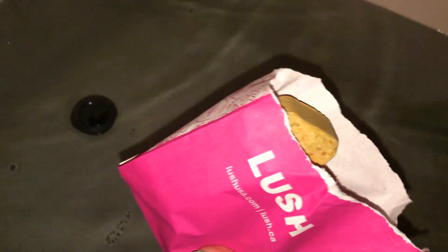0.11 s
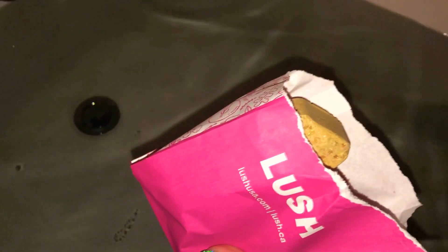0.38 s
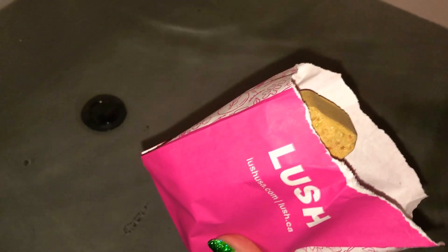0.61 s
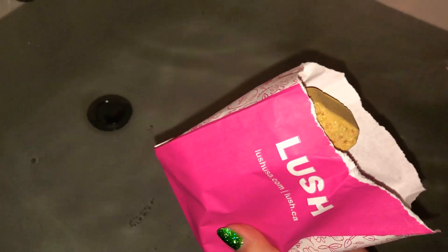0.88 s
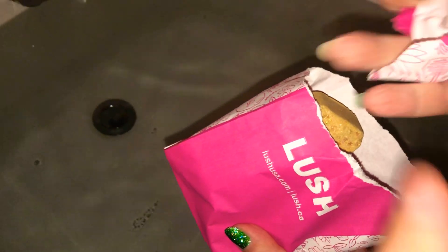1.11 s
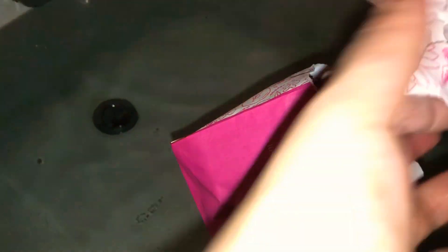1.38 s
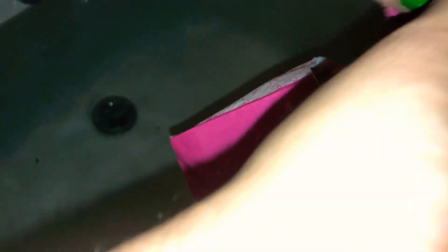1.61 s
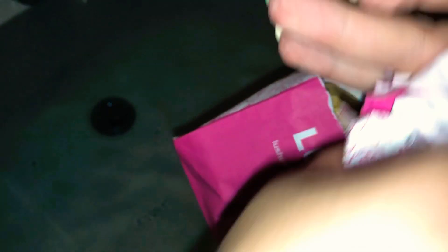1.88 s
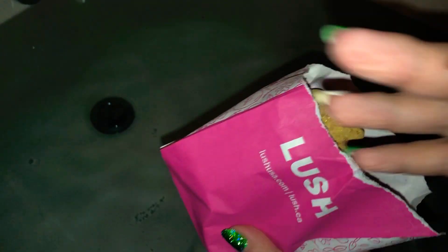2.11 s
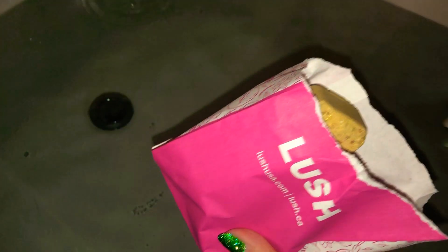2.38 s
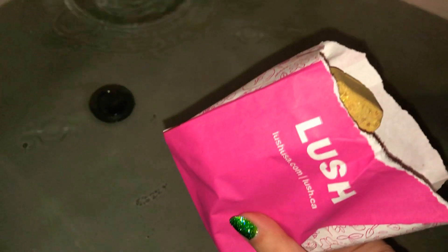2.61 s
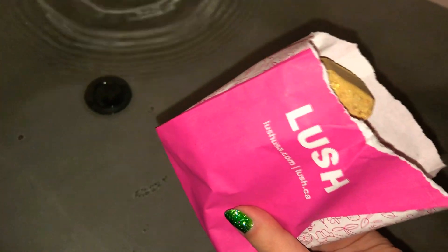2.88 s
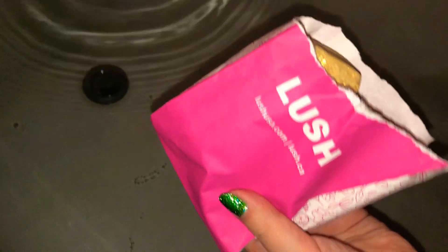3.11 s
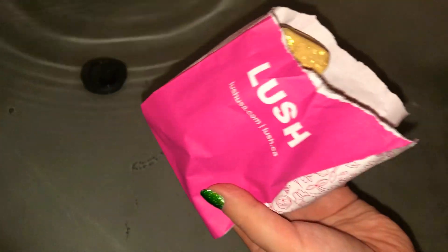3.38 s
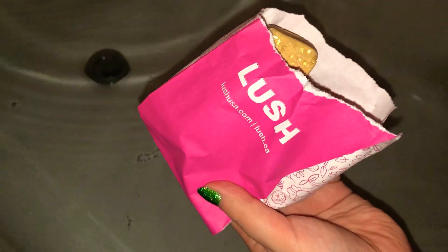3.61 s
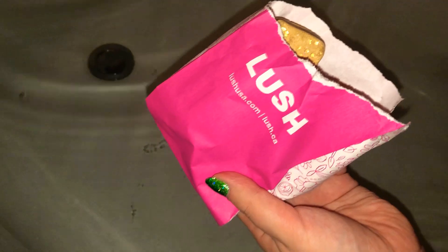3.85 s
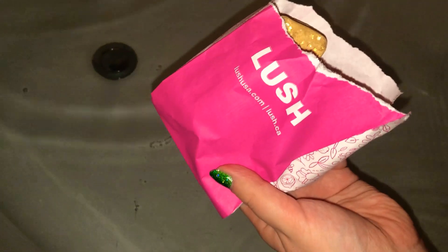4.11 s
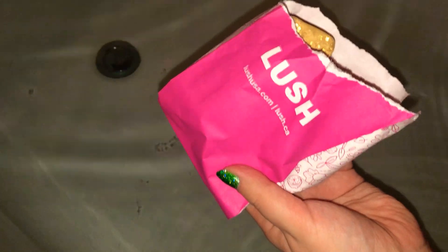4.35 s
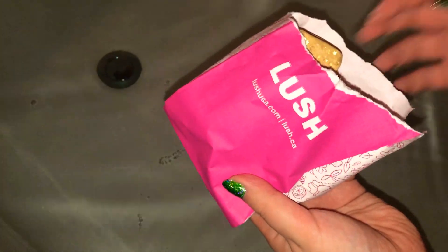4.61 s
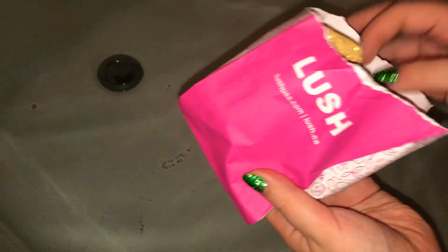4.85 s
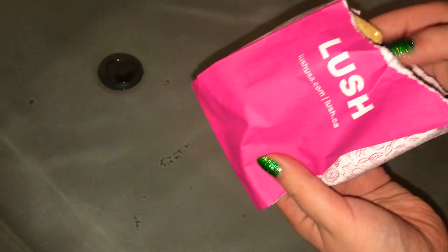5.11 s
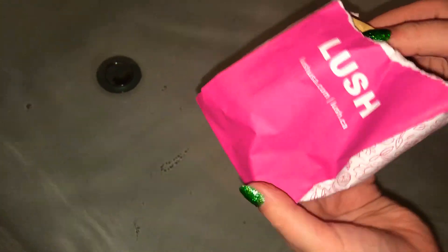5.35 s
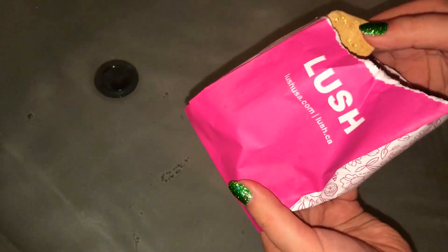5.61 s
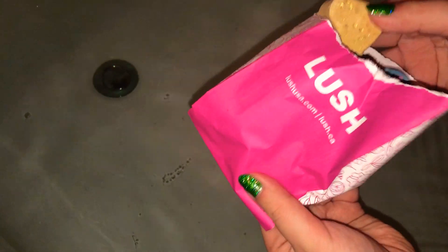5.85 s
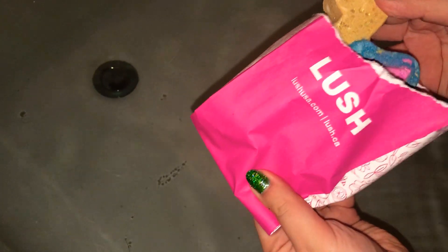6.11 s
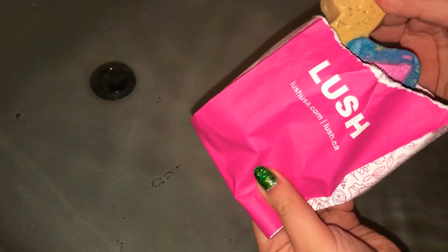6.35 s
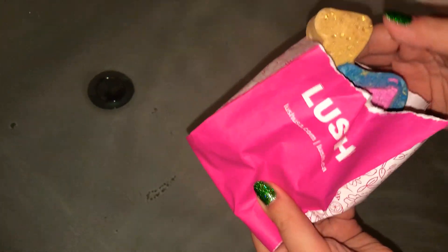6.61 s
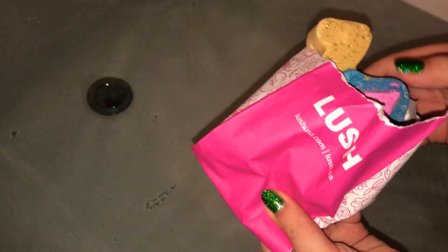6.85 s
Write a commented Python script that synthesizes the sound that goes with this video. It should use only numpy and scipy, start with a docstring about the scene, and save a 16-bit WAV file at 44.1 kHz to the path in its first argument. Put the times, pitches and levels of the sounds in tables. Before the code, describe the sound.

A stiff paper bag crumples with dense, sharp crackles, quiets to near stillness, then crackles again as something is drawn out, in a small hard room.

```python
"""A stiff paper bag is crumpled, held nearly still, then rubbed and bent as something is drawn out of it.
Creases snap as filtered blows: the bending wave brings treble first and bass later, then rattles in noisy
echoes. Rustle and ticks are random slips that follow the effort of the hands; popping walls and the air ringing
inside the bag are short sagging tones. The air in the bag rings, a small hard room answers with shaped noise,
and a low hush lies underneath."""
import sys
import numpy as np
from scipy import signal
from scipy.fft import rfft, irfft, next_fast_len
from scipy.io import wavfile
from scipy.ndimage import uniform_filter1d

SR = 44100
rng = np.random.default_rng(int(sys.argv[2]) if len(sys.argv) > 2 else 0)


def level_to_linear(level):
    """Convert decibel levels to linear amplitude factors, elementwise."""
    exponent = np.asarray(level, float) / 20
    return 10 ** exponent


def unload_audio(sound):
    """Save the sound as a 16-bit wav file, at the path given as the first command line argument."""
    columns = np.transpose(np.atleast_2d(sound))
    # keep every value between -1 and 1, then stretch to whole-number steps
    steps = np.round(np.clip(columns, -1, 1) * 32767)
    wavfile.write(sys.argv[1], SR, steps.astype(np.int16))


N = 307729  # length in samples


def read(points, hz):
    """Joins the points of a spectrum by straight lines on a log frequency axis."""
    point_hz, value = np.transpose(points)
    return np.interp(np.log(hz + 1), np.log(point_hz + 1), value)


def evened(x):
    """Scales to rms 1."""
    return x / np.sqrt(np.mean(x ** 2) + 1e-20)


def add(mix, start_s, sound):
    """Mixes a sound in from start_s."""
    part = mix[max(round(start_s * SR), 0):][:len(sound)]
    part += sound[:len(part)]


def bell(hz, centre_hz, octaves):
    """A bump of height 1 around one pitch, even on a log frequency axis."""
    return np.exp(-(np.log2((hz + 1) / centre_hz) / octaves) ** 2)


def shelves(hz, body_db, edge_db, body_hz=1200, edge_hz=7000):
    """Large folds add body below body_hz, tight folds add edge above edge_hz."""
    body = body_db / (1 + (hz / body_hz) ** 3)
    edge = edge_db / (1 + (edge_hz / (hz + 1)) ** 4)
    return body + edge


def bending(hz, lag_s):
    """Bending waves run at a speed that grows as the root of frequency; lag_s is the delay at 1 kHz."""
    return np.exp(-4j * np.pi * lag_s * np.sqrt(1000 * hz))


def causal(gain_db):
    """Gives a colour the phase of a filter that rings only after the blow (minimum phase)."""
    cepstrum = irfft(gain_db * np.log(10) / 20)
    cepstrum[len(gain_db):] = 0
    cepstrum[1:len(gain_db) - 1] *= 2
    return np.exp(rfft(cepstrum))


# colour of the hush: pitch_hz [Hz], level_db [relative dB per Hz]
AIR_COLOUR = [(15, -35.5), (25, -7), (105, 5), (180, -5), (249, 1.5), (326, -19.5), (480, -4.5),
              (1190, -35), (3520, -22.5), (16000, -33.5)]


def air():
    """The low steady hush of the room: coloured noise at an rms of -70 dB."""
    hz = np.fft.rfftfreq(N, 1 / SR)
    spectrum = rfft(rng.standard_normal(N)) * level_to_linear(read(AIR_COLOUR, hz))
    return level_to_linear(-70) * evened(irfft(spectrum, N))


# how long the room rings: pitch_hz [Hz], t60_s [s to die by 60 dB]
ROOM_DECAY = [(300, 0.13), (1300, 0.17), (3500, 0.17), (9000, 0.16), (16000, 0.12)]


def room(x):
    """Dense reflections off hard walls, each band dying at its own speed."""
    since = np.arange(SR // 2) / SR
    build_up = np.clip(since / 0.013, 0, 1)
    reflections = rng.standard_normal(SR // 2) * build_up
    hz, t, bands = signal.stft(reflections, SR, nperseg=128)
    decay_db = -60 * t / read(ROOM_DECAY, hz)[:, None]
    tail = signal.istft(bands * level_to_linear(decay_db), SR, nperseg=128)[1]
    return signal.fftconvolve(x, tail / np.linalg.norm(tail))[:N]


# the air inside the bag: pitch_hz [Hz], width_hz [Hz], level_db [dB]
BAG_AIR = (790, 68, -16.5)


def hollow(x):
    """The air in the bag rings briefly, as one resonance, at whatever the walls do."""
    pitch_hz, width_hz, level_db = BAG_AIR
    return level_to_linear(level_db) * signal.lfilter(*signal.iirpeak(pitch_hz, pitch_hz / width_hz, SR), x)


def pop(peak_db, pitch_hz):
    """A short pop: a few cycles around pitch_hz that sag in pitch."""
    cycles = np.arange(0, 12, pitch_hz / SR)
    tone = np.sin(2 * np.pi * (1.035 * cycles - 0.0066 * cycles ** 2))
    shape = cycles * np.exp(-cycles * 0.86) * tone
    return level_to_linear(peak_db) * shape / abs(shape).max()


# walls of the bag popping in and out, and the air inside ringing out near 800 Hz: start_s [s], peak_db [dB],
# pitch_hz [Hz]
BAG_POPS = [(0.84, -52.5, 112), (.943, -40, 387), (.944, -34.5, 790), (1.005, -37, 800),
            (1.045, -45.5, 283), (1.171, -35.5, 806), (2.949, -43, 770), (3.152, -53.5, 108),
            (3.318, -48, 730), (3.445, -53, 312), (4.019, -48.5, 920), (4.796, -56.5, 119),
            (4.865, -49.5, 735), (5.59, -40, 455), (5.592, -36, 890), (5.595, -54, 156), (6.09, -49, 278),
            (6.099, -42.5, 117), (6.127, -33, 282), (6.529, -53, 89.5), (6.687, -31.5, 1150),
            (6.815, -36, 950)]


def pops(paper):
    """Walls of the bag pop in and out as their panels flip, and the air inside rings out near 800 Hz; each
    starts 2 ms ahead of its time."""
    for start_s, peak_db, pitch_hz in BAG_POPS:
        add(paper, start_s - .002, pop(peak_db, pitch_hz))


# fingers sliding over the paper: full_s [s of full effort], effort_db [dB],
# rise_s [s to rise 20 dB; sign ignored, kept within 1 to 100 ms], hold_s [s], panel_hz [Hz, panel under the fingers]
FINGER_STROKES = [(1.94, -41.5, 0.1, 0.03, 3400), (2.46, -46, 0.1, 0.018, 5500),
                  (3.502, -49, 0, 0.14, 1010), (3.864, -56.5, -1.4, 0.02, 4100),
                  (5.571, -40.5, 0.1, 0.011, 5930), (6.456, -40, 0.1, 0.087, 2100),
                  (6.526, -40.5, -3.6, 0.015, 7650)]
# the sheet gives way at once and crackles while it settles:
# full_s [s of full effort], effort_db [dB], hold_s [s], panel_hz [Hz, panel that gives]
SHEET_JOLTS = [(0.43, -42, 0.118, 2600), (0.7, -40, 0.061, 3700), (0.865, -50.5, 0.013, 3500),
               (1.054, -42, 0.033, 7540), (1.11, -39.5, 0.046, 2200), (1.165, -47, 0.11, 3400),
               (2.057, -34.5, 0.089, 6160), (2.691, -46.5, 0.34, 3700), (2.96, -50.5, 0.04, 780),
               (3.045, -49, .008, 2600), (3.303, -60.5, 0.017, 720), (3.216, -51, 0.081, 6800),
               (4.014, -63.5, 0.02, 890), (4.228, -50, 0.011, 1400), (4.38, -64.5, 0.025, 3900),
               (4.531, -65.5, 0.027, 3700), (4.905, -53.5, 0.051, 2140), (4.934, -44.5, 0.23, 760),
               (5.28, -59, 0.03, 1500), (5.316, -45, 0.025, 7550), (5.395, -42.5, 0.037, 870),
               (5.507, -43, 0.064, 5960), (5.83, -42.5, 0.4, 2720), (6.302, -51, 0.007, 6000),
               (6.33, -53, 0.031, 4300), (6.669, -52, 0.012, 2400), (6.686, -41.5, 0.0079, 2300),
               (6.742, -46.5, 0.14, 940)]


def gestures(t):
    """Strokes and jolts rise, sag while held and let go: yields the power and panel pitch of each."""
    jolt_rise_s = .002  # to rise 20 dB
    sag_db_per_s, release_db_per_s = 35.5, 267
    jolts = [(s, db, jolt_rise_s, hold_s, hz) for s, db, hold_s, hz in SHEET_JOLTS]
    for full_s, effort_db, rise_s, hold_s, panel_hz in FINGER_STROKES + jolts:
        since = t - full_s
        held = np.clip(since, 0, abs(hold_s))
        rise_db = 20 * np.minimum(since, 0) / np.clip(abs(rise_s), .001, .1)
        release_db = release_db_per_s * np.maximum(since - held, 0)
        yield level_to_linear(2 * (effort_db + rise_db - sag_db_per_s * held - release_db)), panel_hz


# the uneven kneading of the bag, swelling and sinking, nearly still around 4 s: time_s [s], effort_db [dB]
KNEADING = [(0.0, -62.5), (0.3, -39), (0.42, -41), (0.69, -47), (0.89, -44), (1.1, -42.5), (1.33, -35),
            (1.36, -43), (1.47, -45), (1.55, -44), (1.68, -38), (1.89, -46), (2.03, -48.5), (2.18, -42.5),
            (2.33, -30), (2.4, -49.5), (2.65, -56.5), (2.95, -53), (3.11, -42), (3.2, -55), (3.46, -57),
            (3.75, -64), (3.8, -65), (4.1, -73), (4.21, -77.5), (4.48, -75), (4.63, -74), (4.73, -78),
            (5.26, -67.5), (5.65, -48.5), (5.79, -56), (6.17, -42), (6.29, -58), (6.62, -60), (6.98, -53)]


def effort(t):
    """Effort of the hands in dB: kneading plus strokes and jolts; powers add."""
    kneading = level_to_linear(2 * np.interp(t, *np.transpose(KNEADING)))
    return 10 * np.log10(kneading + sum(power for power, panel_hz in gestures(t)))


def ticks(effort_db):
    """Small stray creases, each kind with its own pitch, a cycle or two long, following the effort."""
    out, t = np.zeros(N), np.arange(400) / SR
    for hz in np.geomspace(2000, 12000, 12):
        struck = rng.random(N) < 22 / SR  # about 22 a second of each kind
        size = level_to_linear(3.5 * np.minimum(rng.exponential(1, N), 4)) * struck
        tick = np.sin(2 * np.pi * hz * t) * hz * t * np.exp(-hz * t / 0.45)
        out += signal.oaconvolve(size, tick)[:N]
    return out * level_to_linear(effort_db + 14)


def patchy(shape, bands, frames):
    """Random unevenness over pitch and time, smoothed over so many bands and frames."""
    across = uniform_filter1d(rng.standard_normal(shape), bands, 0)
    return evened(uniform_filter1d(across, frames, 1))


# fine rustle: pitch_hz [Hz], level_db [relative dB per Hz]
RUSTLE_COLOUR = [(35, -31), (100, 3.5), (260, 12.5), (700, 9.5), (1200, 9), (3700, 6.5), (8000, 8),
                 (15000, 4.5)]
# colour of the rustle over time: time_s [s], body_db [dB, at middling effort], edge_db [dB]
RUSTLE_TONE = [(0, -8.5, -11.5), (0.45, -2.5, -15.5), (0.9, -5, -5.5), (1.27, -10, -16.5),
               (1.9, -8.5, -10.5), (2.1, -5.5, -10.5), (2.35, -12, -23.5), (2.5, -16, -13),
               (2.75, -19.5, -18), (2.95, -8, -11), (3.1, -15.5, -6), (3.35, -0.5, -7), (3.6, -18, -10),
               (4.1, -5.5, -16.5), (4.601, -13.5, -6), (4.87, 2, -10), (5.0, 1, -9.5), (5.35, -7.5, -6),
               (5.6, 1, -6), (5.8, 2, -6.5), (6.1, 4, -7.5), (6.3, -1, -8.5), (6.55, 1.5, -7),
               (6.98, -1, -11)]


def rustle(effort_db):
    """Thousands of tiny slips and buckles, coming in clumps, coloured by how the hands bend the sheet."""
    slips_per_s, slip_spread_db, clump_db = 6000, 2.6, 2.0
    middling_db, body_slope = -50, -0.5  # the body swells less than the rest as effort grows (dB per dB)
    panel_db, panel_octaves = 4.5, 0.21  # how strongly and widely the handled panel colours its rustle
    broad_db = 7  # broad panels below 1 kHz ring this much more

    clumps = evened(uniform_filter1d(rng.standard_normal(N), 500))
    size = level_to_linear(slip_spread_db * np.minimum(rng.exponential(1, N), 6) + clump_db * clumps)
    slips = size * rng.choice([-1, 1], N) * (rng.random(N) < slips_per_s / SR)
    hz, t, bands = signal.stft(evened(slips), SR, nperseg=512, noverlap=384)
    hz = hz[:, None]

    time_s, body_db, edge_db = np.transpose(RUSTLE_TONE)
    frame_effort_db = effort(t)
    body_db = np.interp(t, time_s, body_db) + body_slope * (frame_effort_db - middling_db)
    edge_db = np.interp(t, time_s, edge_db)
    panels = 0
    for power, panel_hz in gestures(t):
        height_db = panel_db + broad_db * (panel_hz < 1000)
        panels = panels + power * height_db * bell(hz, panel_hz, panel_octaves)
    # each panel counts by its share of the whole effort
    bend_db = shelves(hz, body_db, edge_db) + panels / level_to_linear(2 * frame_effort_db)

    patches_db = 1.7 * patchy(bands.shape, 10, 8)
    rings_db = 3 * patchy(bands.shape, 3, 30) / (1 + hz / 3000)  # narrow and lasting
    colour_db = read(RUSTLE_COLOUR, hz) + bend_db + patches_db + rings_db
    bands = bands * level_to_linear(colour_db) * bending(hz, 0.00123)
    sound = signal.istft(bands, SR, nperseg=512, noverlap=384)[1][:N]
    return sound * level_to_linear(effort_db)


# colour of one snap: pitch_hz [Hz], level_db [relative dB]
SNAP_COLOUR = [(150, -19), (600, -6.5), (1200, 2), (7000, 1), (16000, -8.5)]


def snap(peak_db, peak_hz, body_db, edge_db, rattle_db, chance):
    """A sudden buckle, then its echoes from folds and edges; more rattle also spreads the wave more."""
    t, hz = np.arange(len(chance)) / SR, np.fft.rfftfreq(len(chance), 1 / SR)
    bump_db = 7 * bell(hz, peak_hz, 0.28)
    colour = causal(read(SNAP_COLOUR, hz) + bump_db + shelves(hz, body_db, edge_db))
    colour = colour * bending(hz, 0.00589 * level_to_linear(rattle_db))
    buckle = irfft(colour)
    top = abs(signal.hilbert(buckle)).max()
    # a slow and a very fast decay, each given by its s to fall 20 dB
    fading = level_to_linear(-20 * t / 0.011) + 0.36 * level_to_linear(-20 * t / 0.00019)
    echoes = chance * abs(chance) * fading * np.clip(t / 0.00015, 0, 1)
    rattle = level_to_linear(rattle_db) * top * irfft(rfft(echoes) * colour) / np.linalg.norm(buckle)
    return level_to_linear(peak_db) * (buckle + rattle) / top  # peak_db is that of the buckle alone


# a fold that creaks: start_s [s], slips [count], gap_s [s between slips], peak_db [dB], pitch_hz [Hz]
FOLD_CREAK = (1.8755, 5, 0.0102, -27, 9500)


def creak(paper):
    """A fold creaks in a short, slightly uneven run of thin ticks, each a small snap."""
    start_s, slips, gap_s, peak_db, pitch_hz = FOLD_CREAK
    for k, chance in enumerate(rng.standard_normal((slips, 4096))):
        tick = snap(peak_db, pitch_hz, -20, 22, -30, chance)
        add(paper, start_s + gap_s * (k + 0.08 * chance[0]), tick)


# creases that snap: start_s [s], peak_db [dB], peak_hz [Hz, pitch brought out],
# body_db [dB, below 1.2 kHz], edge_db [dB, above 7 kHz]
CREASES = [(0.2456, -23.5, 6600, 1.5, 9), (0.436, -18.5, 4780, 7.5, 2), (0.448, -16, 2910, -21, -52),
           (0.477, -25.5, 1320, -13, -34), (0.502, -19, 4560, -3, -2), (0.545, -12, 10200, -12, -5.5),
           (0.7029, -10, 3540, -50, -70), (0.7068, -19.5, 3820, -9, -12.5), (0.7693, -12.5, 2340, 3, -1.5),
           (0.8, -12.5, 6970, -53, -4), (0.858, -27.5, 2670, -22.5, -24.5), (0.944, -19.5, 8000, 11, 4.5),
           (1.0011, -14, 2030, 0, 3), (1.0433, -6, 7470, -23, -4.5), (1.1111, -18.5, 6200, 11, 11.5),
           (1.1708, -16, 8500, -10, -4), (1.228, -21.5, 4910, -21, -10.5), (1.28, -21.5, 5680, 12, 7),
           (1.345, -23.5, 7000, -1, 15), (1.4012, -23, 6800, 3.5, 3.5), (1.4072, -21.5, 6870, -11, 5),
           (1.4512, -11, 5400, -1, -4.5), (1.4955, -28.5, 2860, -15, -2.5), (1.62, -25, 3770, -17, -3),
           (1.669, -20.5, 3520, -1.5, -9), (2.0435, -27, 1820, -16, -22), (2.1165, -7, 4570, -53, -11),
           (2.1307, -15, 3950, -18, -7.5), (2.1463, -24.5, 4330, -3, -11), (2.1799, -13, 3120, -5.5, -9.5),
           (2.2431, -11.5, 3890, -25, -7), (2.255, -20.5, 4200, -5.5, 29), (2.441, -24, 2620, -19, -15),
           (2.4768, -24, 8800, -42, -3), (2.5906, -37.5, 2930, -7, -13), (2.6076, -37, 3230, -23, -24),
           (2.671, -32.5, 6400, -14, -8), (2.7024, -30.5, 3570, -11, -19), (2.752, -37.5, 2700, -13, -12),
           (2.913, -35, 1870, 9, -20), (2.9938, -27.5, 5700, -14, 1), (3.1669, -33, 4400, -22, -10),
           (3.2193, -10.5, 7420, -41, 2), (3.276, -34, 6980, -14, 16), (3.2982, -27, 7350, 28, 24),
           (3.305, -22.5, 9600, -23, 2), (3.3922, -33.5, 7240, -8, 16), (3.482, -27, 3800, -34, 1),
           (3.6625, -33, 4700, -10, -15), (3.8096, -45, 4860, -7, 9), (3.845, -48, 4660, -12, -3),
           (3.8648, -35.5, 5150, -5, -5), (3.9625, -41, 3730, 4, -3.5), (4.231, -43, 1440, -8, -24),
           (4.571, -42.5, 4280, -33.5, 1), (4.784, -49.5, 3615, -12.5, 5.5), (4.802, -48, 5600, -23, 8),
           (5.2925, -33.5, 9560, 0, -3), (5.3042, -29, 11100, -25, 0), (5.34, -28.5, 8800, -17, 0),
           (5.5092, -27.5, 4460, 15, -14), (5.5555, -19.5, 6050, -4, -12), (5.575, -25, 2350, 0, -13),
           (5.593, -21.5, 2960, 16, -21), (5.7367, -27, 6200, 5, -9), (5.757, -34.5, 1970, -3.5, -21),
           (5.8169, -26, 1086, 13.5, 2.5), (5.8303, -12, 7900, -23, -8), (5.8476, -20.5, 1095, 6, 6),
           (5.891, -23, 9690, 5, -4), (5.8965, -15.5, 10200, -13, 7), (5.9125, -16.5, 1970, 5.5, -6),
           (5.946, -22, 5600, -18, -8), (5.9725, -29, 5120, -14.5, 23), (5.992, -4, 4770, 13, 7),
           (6.091, -24.5, 1900, 20, -34), (6.1292, -27, 4430, -1, -1), (6.1765, -21, 4010, -27, 8),
           (6.2412, -26.5, 4060, 11, 4), (6.2576, -33, 1880, 13, -18), (6.3182, -21, 1880, 2, -12),
           (6.345, -28, 8950, -25, -5), (6.411, -32, 2940, -16, 5), (6.4379, -30, 1280, 9, -15),
           (6.451, -32.5, 2200, -6, -23), (6.6716, -35.5, 2400, 21, -9), (6.6926, -14, 5880, 6.5, -18),
           (6.7497, -3, 8700, 2.5, -2.5), (6.853, -24.5, 8400, 8, 14), (6.9322, -34.5, 1300, 23, -26),
           (6.961, -34, 6300, -14, 12)]


def creases(paper):
    """Creases of the bag snap one by one; softer snaps rattle more, tight high folds rattle less."""
    rattle_at_0_db, rattle_slope = -19, -0.131  # dB for a snap peaking at 0 dB, dB per dB of peak
    tight_db = -2.5  # per octave above 4 kHz
    for start_s, peak_db, peak_hz, body_db, edge_db in CREASES:
        rattle_db = rattle_at_0_db + rattle_slope * peak_db + tight_db * np.log2(peak_hz / 4000)
        chance = rng.standard_normal(4096)
        add(paper, start_s - .0003, snap(peak_db, peak_hz, body_db, edge_db, rattle_db, chance))


def scene():
    """Paper, room and hush, summed to one channel."""
    effort_db = effort(np.arange(N) / SR)
    paper = rustle(effort_db) + ticks(effort_db)
    pops(paper)
    creak(paper)
    creases(paper)
    paper = paper + hollow(paper)
    return (paper + level_to_linear(-11.5) * room(paper) + air())[None]


def roll_off(x):
    """The treble ends steeply here."""
    return signal.sosfilt(signal.butter(12, 17030, fs=SR, output="sos"), x)


# band of the whole recording chain: pitch_hz [Hz], level_db [dB]
CHAIN_BAND = [(20, -3), (40, -0.5), (15600, -1), (15900, -38), (22050, -36.5)]


def record(dry):
    size = next_fast_len(N)
    gain = level_to_linear(read(CHAIN_BAND, np.fft.rfftfreq(size, 1 / SR)))
    heard = irfft(rfft(dry, size) * gain, size)[:, :N]
    return roll_off(heard)


dry = scene()
out = record(dry)
unload_audio(out)
```